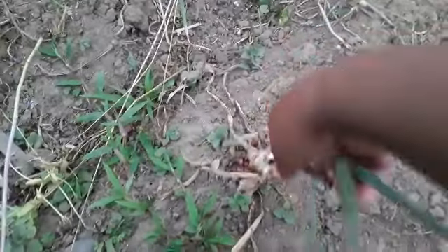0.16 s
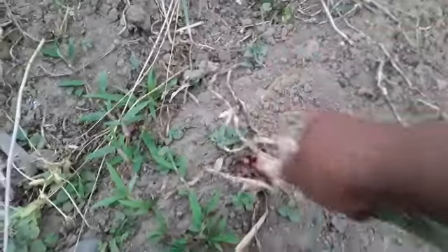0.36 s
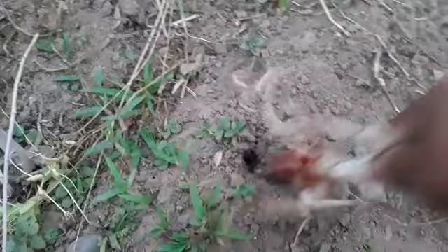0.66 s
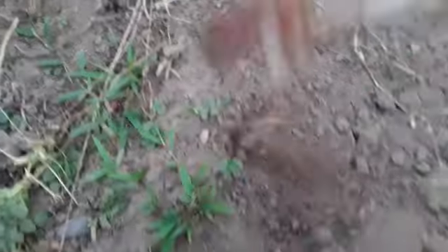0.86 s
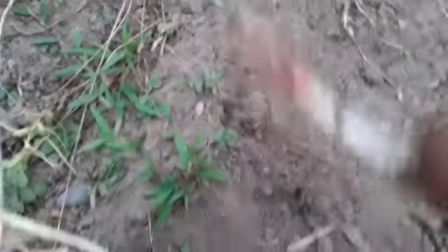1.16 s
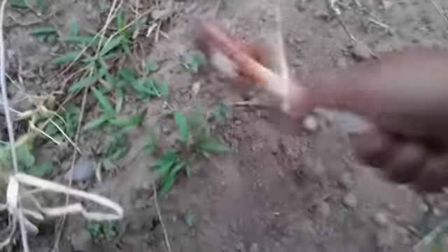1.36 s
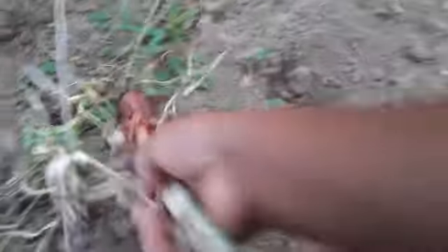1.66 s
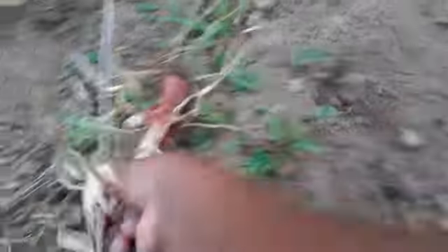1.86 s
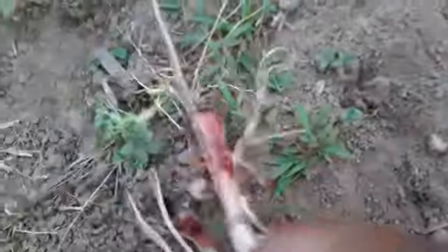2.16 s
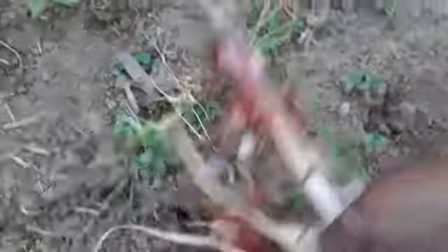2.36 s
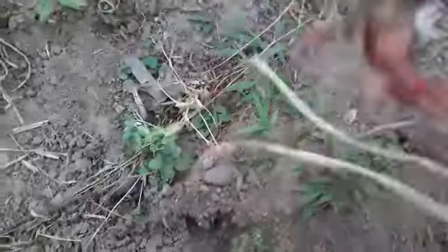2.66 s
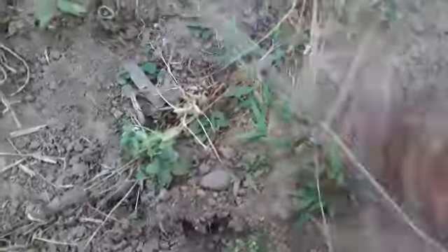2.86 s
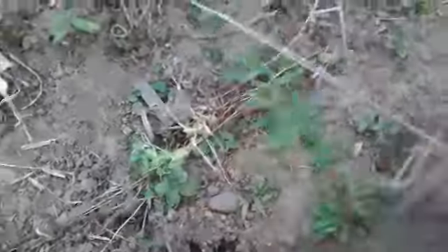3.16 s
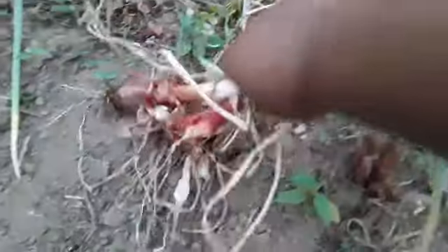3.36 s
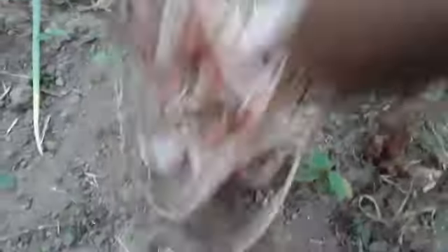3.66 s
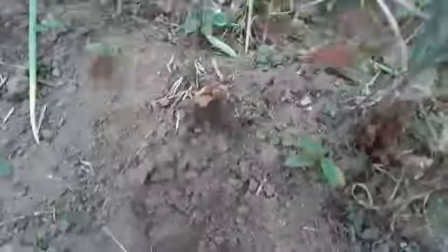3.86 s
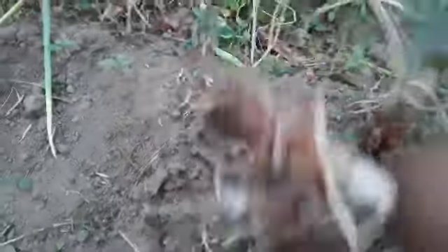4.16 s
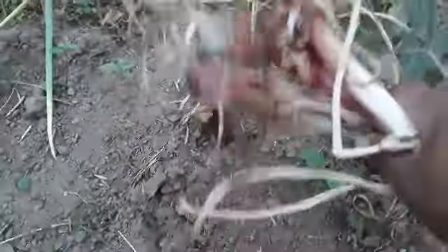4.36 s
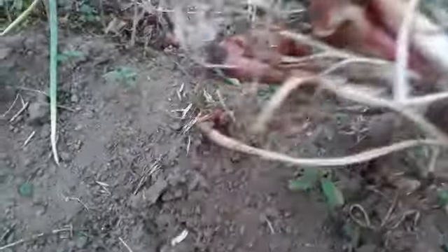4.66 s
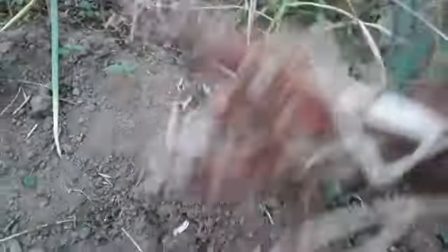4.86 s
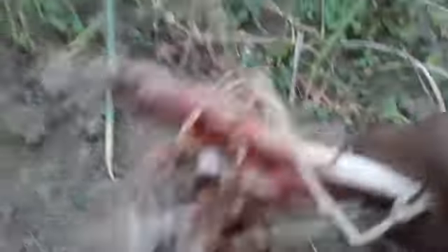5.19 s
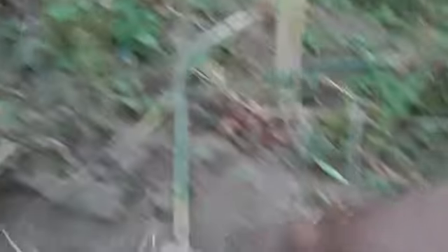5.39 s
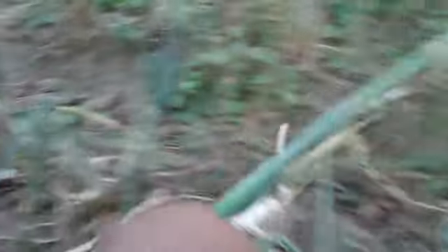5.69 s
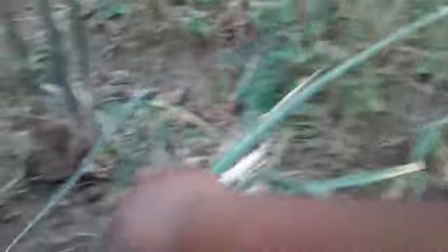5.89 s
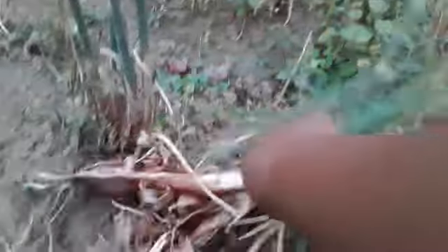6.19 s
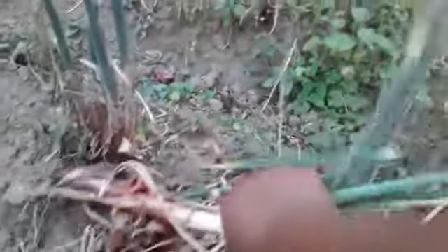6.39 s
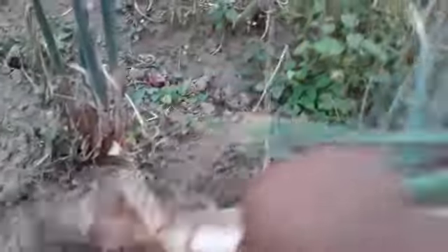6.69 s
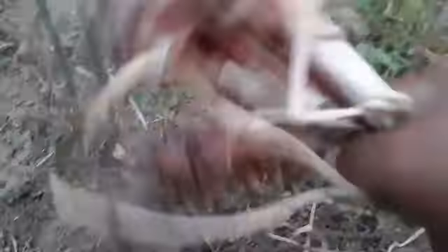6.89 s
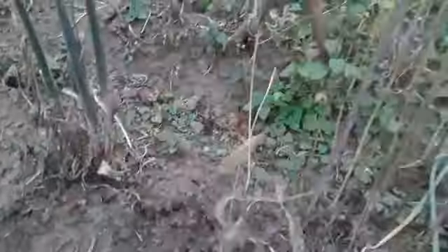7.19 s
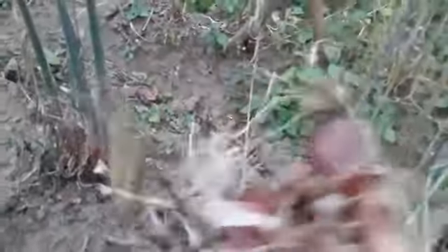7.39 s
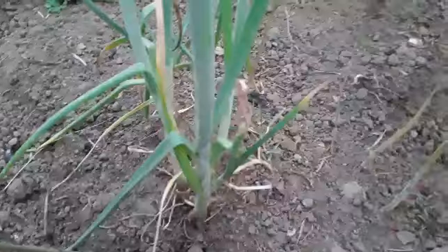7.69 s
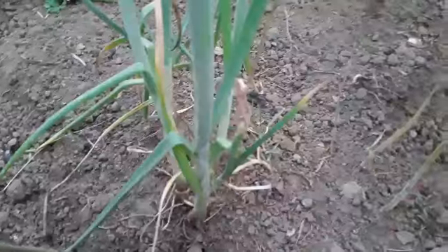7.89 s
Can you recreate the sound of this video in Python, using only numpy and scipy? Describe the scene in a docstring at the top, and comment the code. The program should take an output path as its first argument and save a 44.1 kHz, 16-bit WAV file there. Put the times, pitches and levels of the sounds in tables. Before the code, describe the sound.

Dry, brittle crackles and papery rustling of uprooted onions, close up outdoors, with a far engine humming low before a sudden drop to quiet hiss.

```python
"""Dry soil, a phone's microphone close by: onions are pulled and shaken from the start. Noise through papery
bands makes the rustle; short bursts crackle, ringing clicks pop, and a low sine knocks on the phone.
Far off an engine idles until about 1.6 s, when another starts to drive by, changing gear: both are sums of sines.
Green leaves are rubbed at 6 to 6.8 s. Just after 7.6 s all falls nearly silent, then a quiet bed comes up:
filtered hiss and a thin, far, falling tone, with one last pop."""
import sys
import numpy as np
from scipy import signal
from scipy.fft import rfft, irfft
from scipy.io import wavfile

SR = 44100
rng = np.random.default_rng(int(sys.argv[2]) if len(sys.argv) > 2 else 0)


def to_wav(sig):
    """Store sig (one row per channel, or 1-D mono) as 16-bit WAV at the path in sys.argv[1].

    Samples outside -1..1 are clipped; the rate is SR.
    """
    pcm = np.clip(np.atleast_2d(sig), -1, 1) * 32767
    pcm = np.round(pcm).astype(np.int16)
    wavfile.write(sys.argv[1], SR, pcm.T)  # frames by channels


N = 354556
TIME = np.arange(N) / SR

# Close: papery hiss before trim and texture: time_s, level_db
RUSTLE_LEVEL = [(0.0, -44.5), (0.059, -49), (0.083, -42), (0.109, -51.5), (0.177, -32), (0.226, -55),
                (0.243, -43.5), (0.27, -52), (0.303, -33), (0.326, -47), (0.34, -48), (0.377, -43),
                (0.408, -45), (0.436, -40), (0.519, -39.5), (0.546, -39.5), (0.59, -44), (0.832, -39),
                (0.89, -45.5), (0.909, -38), (0.922, -44), (0.985, -47.5), (1.045, -43), (1.073, -48),
                (1.116, -47.5), (1.156, -37), (1.197, -44.5), (1.267, -38), (1.32, -54.5), (1.358, -46),
                (1.399, -32.5), (1.436, -40), (1.452, -44.5), (1.535, -43), (1.563, -39), (1.597, -37.5),
                (1.629, -23.5), (1.663, -32), (1.742, -32.5), (1.799, -40), (1.863, -35.5), (1.9, -46),
                (1.924, -34), (1.953, -39), (2.026, -37.5), (2.176, -38), (2.212, -39.5), (2.227, -36),
                (2.27, -37.5), (2.415, -35.5), (2.437, -33), (2.488, -33.5), (2.542, -33), (2.589, -37.5),
                (2.641, -36.5), (2.663, -28.5), (2.699, -42.5), (2.747, -42), (2.764, -36.5),
                (2.805, -48.5), (2.828, -38), (2.877, -38.5), (2.936, -41.5), (2.982, -32), (3.066, -40.5),
                (3.131, -40), (3.212, -42.5), (3.236, -39), (3.269, -47.5), (3.33, -43), (3.353, -34.5),
                (3.389, -45), (3.432, -33.5), (3.47, -38), (3.583, -34.5), (3.606, -39), (3.704, -39),
                (3.802, -35.5), (3.875, -42.5), (4.02, -35.5), (4.081, -37), (4.119, -25.5), (4.153, -36),
                (4.245, -42.5), (4.355, -43), (4.419, -52.5), (4.48, -42.5), (4.69, -53), (4.96, -44.5),
                (5.055, -53.5), (5.185, -41.5), (5.215, -46), (5.275, -35), (5.319, -38), (5.364, -45.5),
                (5.449, -37.5), (5.562, -42), (5.658, -44), (5.721, -44.5), (5.81, -46), (5.88, -50),
                (5.981, -46.5), (6.124, -34.5), (6.344, -36), (6.478, -41), (6.783, -36.5), (6.865, -41),
                (6.971, -41.5), (7.042, -38), (7.122, -37), (7.187, -26.5), (7.218, -33), (7.331, -42.5),
                (7.458, -41), (7.582, -43.5)]
# Close: balance of the rubbing, against the papery hiss: time_s, stalks_db, soil_db, top_hiss_db (9 to 16.5 kHz)
RUBBING_BALANCE = [(0.0, -8, -26, -6), (0.11, -2.5, -34, -8), (0.24, -6, -28, -2), (0.45, -9, -31, -6.5),
                   (0.569, -4, -11.5, -4.5), (0.78, -11, -28, -0.5), (0.89, -1.5, -29, 0),
                   (1.0, -9.5, -19, -16), (1.08, -2.5, -16, -5), (1.24, -8, -24, -4), (1.31, 5, -4, 1),
                   (1.41, -3.5, -24, -5), (1.51, 1, -11, -1), (1.63, -5.5, -25, -8), (1.81, 1.5, -7, 0.5),
                   (1.89, -6, -19, -10.5), (2.04, -5, -20.5, -0.5), (2.43, -9.5, -19, -5.5),
                   (2.87, -3.5, -22.5, -1), (3.17, -10.5, -16, -2), (3.35, -3.5, -27, -1),
                   (3.5, -1, -12.5, 0), (3.78, -8.5, -24, -4), (3.88, -8.5, -19.5, -2),
                   (3.96, -11, -45, -5), (4.02, -5.5, -21.5, -1), (4.41, -6, -17.5, 0.5),
                   (4.6, -3.5, -18.5, -1.5), (4.69, -4.5, -15, -9), (4.81, -1, -25, 1.5),
                   (5.02, -9, -19, -9), (5.09, -5, -19.5, -4), (5.41, -6.5, -22.5, -1),
                   (5.56, -2.5, -9.5, -2), (5.88, 1, -12.5, -7), (5.95, -3.5, -7, -3.5),
                   (6.24, -8.5, -20, -0.5), (6.56, -5, -12, -2.5), (6.81, -7, -16, -1.5),
                   (7.37, -6, -18, -1), (7.48, -6.5, -14, 0.5), (7.58, -6, -12.5, -11)]
# Bands of the papery skins, stalks, soil and highest hiss, in that order: low_hz, high_hz
RUBBING_BANDS = [(4500, 9000), (1500, 4500), (250, 1500), (9000, 16500)]
# Rustle as the microphone hears it, shape only: pitch_hz, density_db (per Hz)
PAPERY_SPECTRUM = [(150, -67), (250, -16), (423, -16), (559, -22.5), (946, -14), (1810, -14.5), (2080, -16),
                   (4040, -6.5), (4990, -10.5), (7080, 0), (7590, -2.5), (9200, -21), (12400, -7.5),
                   (15000, -9.5), (16400, -30.5)]
# Close: crackles, levels before trim: peak_s, papery_db, stalk_db, stalk_ring_hz, top_hiss_db, length_ms
CRACKLE_EVENTS = [(0.0867, -34, -23, 4540, -34, 0.82), (0.15, -29, -25, 2390, -34, 1.6),
                  (0.1728, -20.5, -26.5, 2080, -20, 3.1), (0.238, -30, -27, 2540, -25, 1.9),
                  (0.2444, -26, -49, 5500, -24, 1.2), (0.2741, -31, -44, 2300, -45, 1.4),
                  (0.2916, -23.5, -27, 3660, -29, 2.9), (0.315, -27, -39, 3400, -29, 3.8),
                  (0.3862, -22, -29, 4500, -26, 0.88), (0.427, -22, -32, 4500, -28, 2.5),
                  (0.4553, -20, -32, 5400, -27, 1.0), (0.4882, -23, -45, 5500, -22, 1.2),
                  (0.6669, -37, -29, 3830, -20, 1.1), (0.8252, -31, -36, 4700, -26, 2),
                  (0.902, -14, -21.5, 3500, -13, 0.9), (0.9139, -16, -43, 3780, -25, 1.7),
                  (0.9867, -29, -37, 3500, -55, 1.3), (1.0277, -42, -30, 2800, -49, 5.1),
                  (1.0481, -7.5, -17.5, 3800, -23, 1.05), (1.0712, -32, -25.5, 2620, -46, 2.3),
                  (1.1256, -26, -40, 2800, -27, 0.93), (1.1494, -18, -39, 5400, -30, 2.4),
                  (1.1871, -32, -22.5, 3660, -20, 2.3), (1.2578, -20, -39, 4800, -29, 1.9),
                  (1.2622, -25, -32, 4300, -34, 1.8), (1.271, -22, -22.5, 4240, -27, 2.2),
                  (1.403, -23, -40, 5000, -16.5, 1.8), (1.4089, -15, -20, 3070, -21, 0.86),
                  (1.4413, -22, -34, 3700, -37, 1.6), (1.49, -29, -22, 4000, -27, 0.98),
                  (1.5364, -35, -33, 4200, -40, 1.2), (1.5592, -18, -25, 4200, -24, 1.06),
                  (1.6037, -25, -29, 2800, -36, 1.3), (1.6086, -24, -15, 5500, -30, 1.7),
                  (1.6191, -9, -21.5, 3700, -29, 0.65), (1.6277, -11, -23, 5000, -27, 0.87),
                  (1.632, -19.5, -35.5, 3700, -20.5, 7.4), (1.6546, -11.5, -31, 5500, -28, 1.4),
                  (1.7544, -32, -16, 2500, -19, 0.75), (1.777, -14, -40, 5300, -24, 1.4),
                  (1.7858, -24, -36, 5500, -15, 1.7), (1.793, -15, -41, 3800, -24, 1.5),
                  (1.799, -14, -30, 4300, -19, 0.51), (1.8358, -12, -30, 3300, -13, 0.97),
                  (1.8483, -12.5, -28, 1800, -18, 1.6), (1.8594, -22, -41, 4200, -30, 1.1),
                  (1.8695, -25, -38, 4200, -39, 0.41), (1.916, -24, -41, 4100, -46, 1.6),
                  (1.9783, -24, -29, 3800, -36, 1.4), (1.9866, -16, -33, 3200, -33, 1.65),
                  (2.022, -15.5, -43, 3700, -20, 1.2), (2.08, -22, -31, 3600, -36, 1.45),
                  (2.205, -21, -32, 4700, -19, 3.9), (2.212, -18, -30, 4200, -20, 1.1),
                  (2.2227, -23, -38, 4200, -27, 1.8), (2.3215, -20, -27, 4060, -26, 1.5),
                  (2.462, -20, -29, 5400, -22, 1.7), (2.4861, -18, -34, 3600, -19, 1.6),
                  (2.5098, -14, -19, 4360, -14, 1.37), (2.6551, -16, -18, 3960, -23, 1.86),
                  (2.668, -34, -11, 5400, -36, 1.1), (2.6777, -21, -40, 5300, -18, 2.3),
                  (2.852, -23, -28, 4900, -22, 0.85), (2.9157, -17.5, -20, 3880, -19, 0.65),
                  (2.9846, -24, -34, 2940, -23, 6.4), (3.0645, -26, -36, 4400, -39, 1.16),
                  (3.3567, -23, -32, 3180, -35, 3.1), (3.4209, -28, -31, 3700, -29, 2.7),
                  (3.4283, -12.5, -29, 3800, -17, 1.6), (3.4677, -31, -27, 4000, -34, 1.4),
                  (3.5435, -23, -22, 4240, -30, 1.45), (3.679, -26, -27, 3100, -40, 1.7),
                  (3.7617, -30, -20.5, 5430, -41, 1.5), (3.8299, -22, -35, 5500, -31, 1.4),
                  (3.8475, -27.5, -28.5, 4330, -25, 2), (3.9407, -26, -46, 5400, -36, 0.89),
                  (4.108, -19, -22.5, 2120, -77, 7.9), (4.1265, -14, -16, 4900, -38, 4.5),
                  (4.5385, -28, -40, 4400, -34, 1.44), (4.837, -33, -35, 2900, -37, 1.3),
                  (4.9248, -32, -51, 5000, -33, 1.2), (4.954, -29, -43, 2500, -31, 0.91),
                  (5.3164, -26, -38, 5500, -31, 3.1), (5.4881, -26, -45, 5300, -34, 2.1),
                  (5.6533, -26.5, -42, 5200, -27, 5), (6.0993, -25, -33, 4500, -26, 0.79),
                  (6.1166, -30, -36, 4000, -35, 3.0), (6.1221, -23, -19, 4100, -23, 1.2),
                  (6.212, -27.5, -20, 4540, -37, 1.8), (6.2366, -20, -48, 3900, -38, 1.9),
                  (6.339, -26, -22.5, 4140, -32, 2.5), (6.3532, -34, -24, 4100, -26, 2.1),
                  (6.4106, -40, -26.5, 1900, -37, 2.4), (6.5176, -28, -25, 4080, -34, 1.75),
                  (7.168, -19, -27, 3480, -33, 6.4), (7.2478, -17.5, -39, 4200, -30, 1.6),
                  (7.371, -31, -33, 3850, -23, 0.73)]
# Close: resonances of hollow green leaves: pitch_hz, width_hz, level_db (against the rubbing level)
HOLLOW_LEAVES = [(1850, 200, -9), (2320, 110, -7), (3000, 130, -5), (4160, 300, 1)]
# Close: green leaves rubbed: time_s, level_db
LEAF_RUBBING = [(6.02, -75), (6.07, -46), (6.35, -45), (6.55, -50), (6.75, -62), (6.8, -80)]
# Close: dull pops of roots and clods giving way: start_s, peak_db, pitch_hz, ring_cycles (to -60 dB)
ROOT_POPS = [(0.551, -43, 348, 7.5), (0.639, -40, 300, 5.5), (0.691, -47, 350, 6), (.798, -40, 500, 1.9),
             (1.048, -39.5, 298, 8.1), (1.083, -42.5, 288, 10), (1.3268, -9, 1760, 2.6),
             (2.24, -40.5, 335, 11), (3.0772, -19.5, 1490, 2.0), (3.358, -22.5, 2160, 4.6),
             (3.519, -38, 400, 3.6), (3.58, -30, 900, 1.7), (3.591, -26.5, 665, 2.6),
             (3.608, -34, 497, 3.6), (3.631, -32, 1200, 2.0), (4.108, -25.5, 693, 2),
             (4.126, -23, 620, 2.9), (4.8365, -24, 2480, 4.9), (7.164, -26.5, 930, 4.8),
             (7.5325, -28, 900, 1.7), (7.746, -32, 1500, 2.4)]
# On the phone itself: one knock: start_s, level_db, pitch_hz, t60_s
PHONE_KNOCK = (3.078, -40, 68, .15)
# Far: speed of the driving engine: time_s, firings_per_s
DRIVING_SPEED = [(1.6, 29.2), (1.75, 29), (1.9, 31.3), (2.1, 31.9), (2.63, 32.2), (3.09, 26.6), (3.19, 31),
                 (3.26, 31.2), (3.44, 29.3), (3.52, 27.7), (3.79, 26), (4.02, 29.3), (4.47, 32.7),
                 (4.56, 32.3), (4.72, 28.9), (5.08, 26.5), (5.36, 28), (5.55, 27.8), (5.76, 26.8),
                 (6.28, 23.4), (6.88, 21.5), (7.05, 21), (7.6, 21.7)]
# Far: its exhaust before trim: time_s, then order2_db, order3_db, order4_db, order5_db, order6_db, order7_db
DRIVING_ORDERS = [(1.7, -61, -76, -60, -59, -77, -77), (2.15, -76, -77, -68.5, -67.5, -72, -70),
                  (2.6, -75, -67, -85, -63, -82, -69), (3.05, -65, -62, -65, -59.5, -72, -65),
                  (3.5, -72, -69, -55, -58, -83, -63), (3.95, -72, -93, -62, -60, -66, -67),
                  (4.4, -61, -100, -64, -51, -76, -63), (4.85, -75, -69, -55, -62.5, -70, -68),
                  (5.3, -69, -88, -64, -60.5, -59, -88), (5.75, -76, -60, -59, -55, -77, -67),
                  (6.2, -78, -63.5, -70.5, -58, -71, -64), (6.65, -97, -79, -58, -75, -67, -65),
                  (7.1, -82, -82, -67, -67.5, -51, -71), (7.55, -85, -62, -100, -66, -62, -72.5)]
# Far: idling engine: order (multiple of IDLE_HZ), level_db
IDLING_ORDERS = [(4, -78), (5, -62), (6, -64.5), (7, -78), (8, -76.5), (9, -72), (10, -74), (13, -89)]
# Far: traffic rumble, shape only: pitch_hz, density_db (per Hz)
TRAFFIC_SPECTRUM = [(15, -37.5), (25, -24.5), (92, -6.5), (147, -0.5), (170, -2), (210, -5), (430, -21),
                    (600, -27), (780, -65.5), (1320, -120)]
# Quiet bed: hiss, shape only: pitch_hz, density_db (per Hz)
BED_SPECTRUM = [(24, -40), (110, -4), (400, -14), (800, -8), (1800, -10), (2800, -17), (4000, -15),
                (5050, -24), (7800, -9), (9300, -43), (14000, -36), (15500, -28)]
# Quiet bed: faint far tone: time_s, pitch_hz, level_db
FAR_TONE = [(7.71, 742, -52), (7.78, 721, -47.5), (7.82, 710, -65), (7.86, 700, -83)]
# Overall level, down near the end and back: time_s, gain_db
FADE_GAIN = [(0, 0), (7.5, 0), (7.605, -14), (7.614, -70), (7.708, -70), (7.72, -20), (7.78, -8), (8.04, 0)]

SMOOTH_SHARE = .7  # steady part of the rubbing, as an amplitude
GRAINS_PER_S, GRAIN_DECAY_S, GRAIN_SPREAD_DB = 500, 0.0018, 5.5  # rate before clumping
TWIGS_PER_S, TWIG_CYCLES, TWIG_DB = 250, 19, -5  # rate before clumping; ring to -60 dB; against the stalks
STALK_WIDTH_SHARE = .22  # resonance width over its pitch
IDLE_HZ, IDLE_BEAT_S, IDLE_ENDS_S = 16.15, .07, 1.62
RUMBLE_DB, BED_DB = -60, -56  # rms levels before slow drift
BED_STARTS_S = 7.66
MIC_LOW_HZ, MIC_TOP_HZ = 57.6, 16984


def onions():
    """Rubbing noise and frays excite skins, stalks and soil; a top hiss and hollow leaves are added."""
    shared_grains, swell = grains(), drift(54)
    responses = [band_response(edges_hz) for edges_hz in RUBBING_BANDS]
    paper, stalk, _, top = responses
    rustle_db = in_time(RUSTLE_LEVEL)[0]
    balance_db = in_time(RUBBING_BALANCE)
    out = crackles(paper, stalk, top)
    for response, band_db in zip(responses, [0, *balance_db]):
        # Some frays strike every band at once, others only this one
        texture = SMOOTH_SHARE + .25 * shared_grains + .3 * grains()
        level_db = rustle_db + band_db + 0.81 * swell + 1.0 * drift(36) - 2.0
        rubbing = rng.standard_normal(N) * from_db(level_db) * texture
        out += signal.fftconvolve(rubbing, response)[:N]
    out += twigs() * from_db(rustle_db + balance_db[0] + TWIG_DB)
    return out + hollow_leaves(shared_grains)


def hollow_leaves(shared_grains):
    """Rubbing noise rings the hollow green leaves at several pitches, each wavering in level."""
    rubbing = rng.standard_normal(N) * (.5 + 0.44 * shared_grains)
    hollow = np.zeros(N)
    for hz, width_hz, db in HOLLOW_LEAVES:
        ring = rms_one(resonance(rubbing, hz, width_hz))
        hollow += from_db(db + 2.1 * drift(6)) * ring
    return hollow * from_db(in_time(LEAF_RUBBING)[0])


def crackles(paper, stalk, top):
    """Each crackle is a short noise burst in skins, stalks and top hiss; the stalk also rings at its own pitch."""
    out, age = np.zeros(N + 1500), np.arange(1500) / SR
    noises = rng.standard_normal((len(CRACKLE_EVENTS), 3, 1500))
    for (peak_s, paper_db, stalk_db, ring_hz, top_db, ms), noise in zip(CRACKLE_EVENTS, noises):
        rise_s = max(ms, .4) * 0.00039
        bursts = noise * age / rise_s * np.exp(1 - age / rise_s)
        heard = [peak_one(signal.fftconvolve(burst, response)[:1500])
                 for burst, response in zip(bursts, (paper, stalk, top))]
        mixed = from_db([paper_db + 2.0, stalk_db - 6.5, top_db + 1.5]) @ heard
        rung = peak_one(resonance(bursts[1], ring_hz, STALK_WIDTH_SHARE * ring_hz))
        at = round((peak_s - rise_s) * SR)
        out[at:at + len(age)] += mixed + from_db(stalk_db - 0.5) * rung
    return out[:N]


def twigs():
    """Small dry bits: random ticks dealt to small resonators spread in pitch; rms 1."""
    born = rng.random(N) < TWIGS_PER_S * from_db(4.0 * drift(20)) / SR
    sizes = from_db(3.85 * np.minimum(rng.exponential(1, N), 4))
    ticks = born * sizes * rng.choice([-1, 1], N)
    pitches_hz = np.geomspace(1900, 7500, num=18)
    dealt = rng.integers(0, 18, size=N)
    out = np.zeros(N)
    for k, hz in enumerate(pitches_hz):
        out += resonance(ticks * (dealt == k) + 1e-18, hz, ring_width(hz, TWIG_CYCLES))
    return rms_one(out)


def grains():
    """Envelope of tiny frays, coming in clumps, each dying within a few milliseconds; rms 1."""
    born = rng.random(N) < GRAINS_PER_S * from_db(5.0 * drift(25)) / SR
    sizes = from_db(GRAIN_SPREAD_DB * np.minimum(rng.exponential(1, N), 4))
    decay = np.exp(-1 / (GRAIN_DECAY_S * SR))
    return rms_one(signal.lfilter([1], [1, -decay], born * sizes + 1e-18))


def band_response(edges_hz):
    """Impulse response of one band of the papery spectrum, energy 1."""
    sos = signal.butter(3, edges_hz, "band", fs=SR, output="sos")
    impulse = np.eye(1, 4096)[0]
    click = signal.sosfilt(sos, colour(impulse, PAPERY_SPECTRUM))[:2048]
    return click / np.sqrt(np.sum(click ** 2))


def knocks():
    """Pops are soft clicks through a damped resonance; the knock on the phone is a dying low sine."""
    start_s, db, hz, t60_s = PHONE_KNOCK
    age = np.clip(TIME - start_s, 0, 1)
    out = from_db(db - 60 * age / t60_s) * np.sin(2 * np.pi * hz * age)
    for start_s, db, hz, cycles in ROOT_POPS:
        soft_click = np.zeros(3000)
        soft_click[:5] = np.hanning(7)[1:-1]
        pop = peak_one(resonance(soft_click, hz, ring_width(hz, cycles)))
        at = round(start_s * SR)
        out[at:at + len(pop)] += from_db(db) * pop
    return out


def engines():
    """Both distant engines over the rumble of far traffic, which is filtered noise drifting in level."""
    rumble = rms_one(colour(rng.standard_normal(N), TRAFFIC_SPECTRUM))
    return driving_engine() + idling_engine() + from_db(RUMBLE_DB + 2.0 * drift(0.67)) * rumble


def driving_engine():
    """Exhaust orders are sines at multiples of the firing rate, wavering in pitch and level."""
    firings_per_s = in_time(DRIVING_SPEED)[0] * (1 + 0.0029 * drift(4.3))
    phase = 2 * np.pi * np.cumsum(firings_per_s) / SR
    drive = np.zeros(N)
    for order, db in enumerate(in_time(DRIVING_ORDERS), start=2):
        # order squared staggers the starting phases
        drive += from_db(db + 3.0 + 2.0 * drift(6.5)) * np.sin(order * phase + order * order)
    return drive * np.clip((TIME - DRIVING_SPEED[0][0]) / 0.05, 0, 1)


def idling_engine():
    """Orders of one steady rate run in step, so their crests meet and the idle throbs."""
    idle = np.zeros(N)
    for order, db in IDLING_ORDERS:
        wave = np.cos(2 * np.pi * round(order) * IDLE_HZ * (TIME - IDLE_BEAT_S))
        idle += from_db(db + 2.0 * drift(4)) * wave
    return idle * np.clip((IDLE_ENDS_S - TIME) / 0.052, 0, 1)


def quiet_bed():
    """Filtered noise makes the air hiss; a faint gliding sine makes a clear tone that dies away."""
    hz, db = in_time(FAR_TONE)
    tone = from_db(db) * np.sin(2 * np.pi * np.cumsum(hz) / SR)
    hiss = rms_one(colour(rng.standard_normal(N), BED_SPECTRUM))
    return tone + from_db(BED_DB + 1.1 * drift(31)) * hiss


def resonance(x, hz, width_hz):
    """Two-pole resonance of gain 1 on top."""
    r = np.exp(-np.pi * width_hz / SR)
    zeros = np.array([1, 0, -1]) * (1 - r * r) / 2
    poles = [1, -2 * r * np.cos(2 * np.pi * hz / SR), r * r]
    return signal.lfilter(zeros, poles, x)


def ring_width(hz, cycles):
    """Width in Hz of a resonance that falls 60 dB in the given number of cycles."""
    return np.log(1000) / np.pi * hz / cycles


def colour(x, spectrum):
    """Causal (minimum-phase) filter with the given spectrum."""
    hz, db = np.transpose(spectrum)
    grid_hz = np.maximum(np.arange(4097) * SR / 8192, 1)
    log_gain = np.interp(np.log(grid_hz), np.log(hz), db) * np.log(10) / 20
    # Folding the cepstrum forward in time makes the filter causal
    cepstrum = irfft(log_gain)
    cepstrum[1:4096] *= 2
    cepstrum[4097:] = 0
    return signal.fftconvolve(x, irfft(np.exp(rfft(cepstrum))))[:N]


def drift(rate_hz):
    """Slow random wander of rms 1: noise smoothed by two equal poles, one value per 40 samples."""
    r = np.exp(-80 * np.pi * rate_hz / SR)
    noise = rng.standard_normal(N // 40 + 2002)
    slow = signal.lfilter([1], [1, -2 * r, r * r], noise)[2000:]  # skip the settling
    return np.interp(np.arange(N) / 40, np.arange(len(slow)), rms_one(slow))


def in_time(rows):
    """Each column after the time as a curve over all samples."""
    time_s, *columns = np.transpose(rows)
    return [np.interp(TIME, time_s, column) for column in columns]


def from_db(db):
    """Decibels to gain."""
    return 10 ** (np.asarray(db) / 20)


def rms_one(x):
    """Scale to rms 1."""
    return x / np.sqrt(np.mean(x ** 2) + 1e-20)


def peak_one(x):
    """Scale to peak 1."""
    return x / np.abs(x).max()


def scene():
    """Onions close and engines far, then the quiet bed; knocks lie over both, alike in both channels."""
    place = np.where(TIME < BED_STARTS_S, onions() + engines(), quiet_bed())
    mono = place + knocks()
    return np.array([mono, mono])


def record(dry):
    """The microphone drops the deepest bass; the level fades down and back; the top is cut steeply."""
    low_cut = signal.butter(3, MIC_LOW_HZ, "high", fs=SR, output="sos")
    top_cut = signal.cheby2(12, 70, MIC_TOP_HZ, fs=SR, output="sos")  # 70 dB down from MIC_TOP_HZ up
    faded = signal.sosfilt(low_cut, dry) * from_db(in_time(FADE_GAIN)[0])
    return signal.sosfilt(top_cut, faded)


dry = scene()
out = record(dry)
to_wav(out)
```